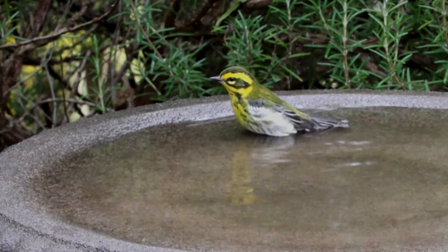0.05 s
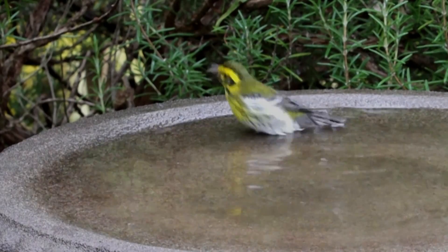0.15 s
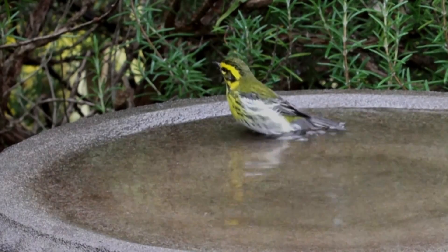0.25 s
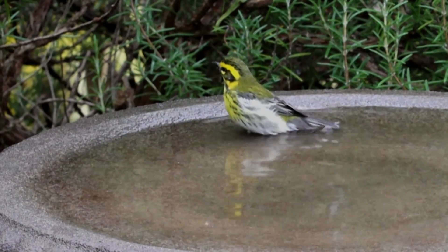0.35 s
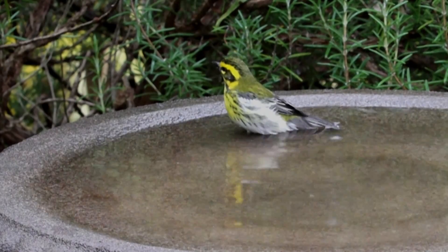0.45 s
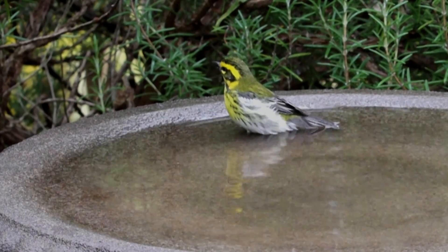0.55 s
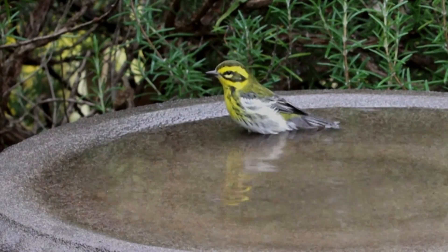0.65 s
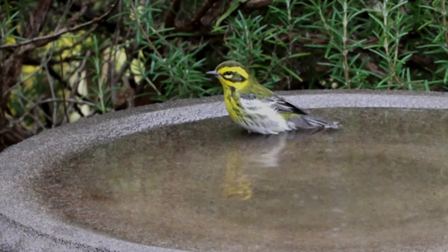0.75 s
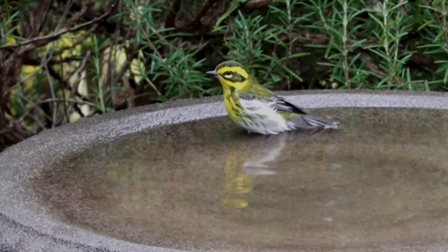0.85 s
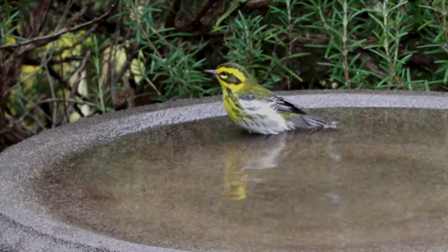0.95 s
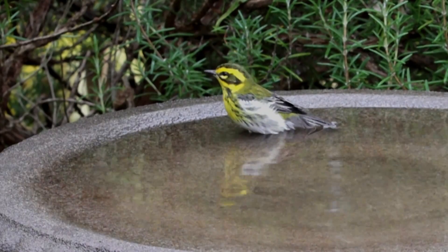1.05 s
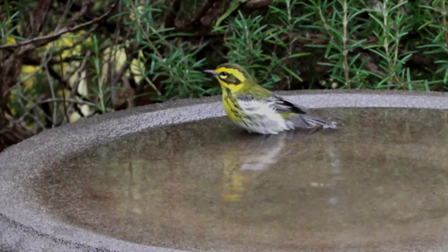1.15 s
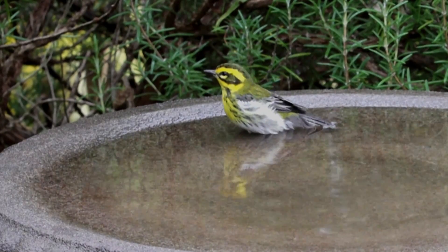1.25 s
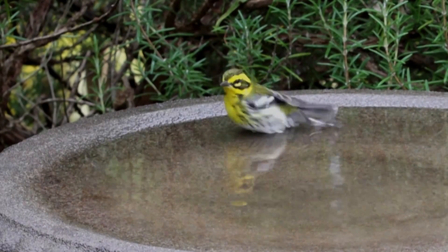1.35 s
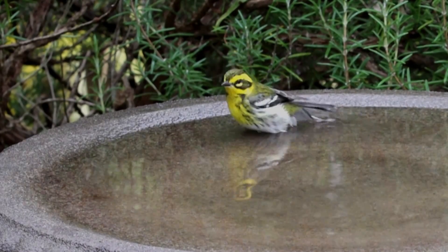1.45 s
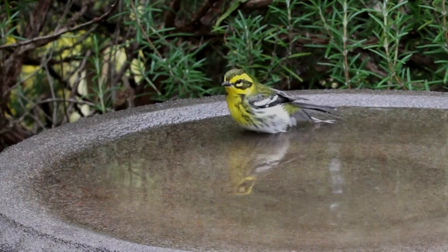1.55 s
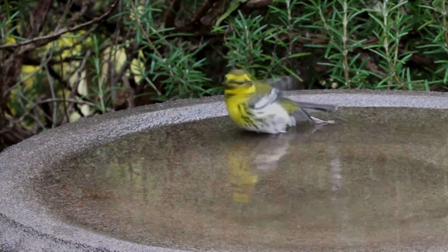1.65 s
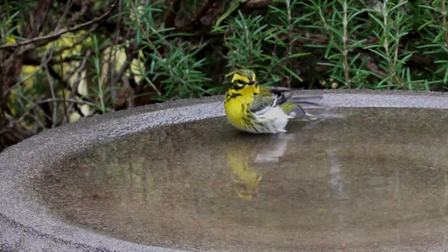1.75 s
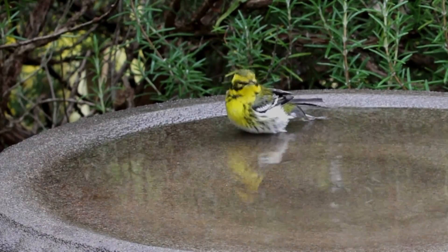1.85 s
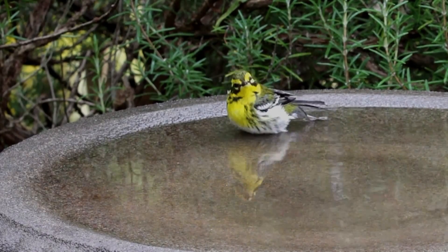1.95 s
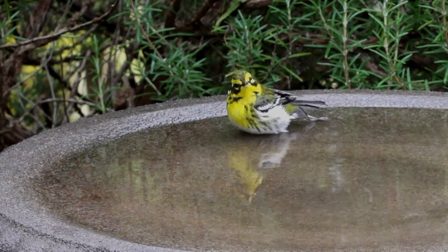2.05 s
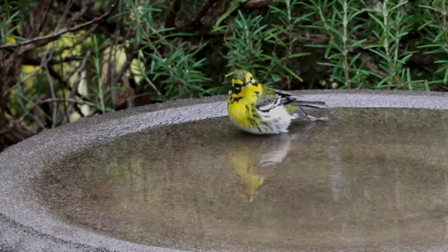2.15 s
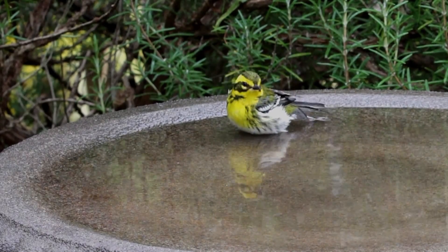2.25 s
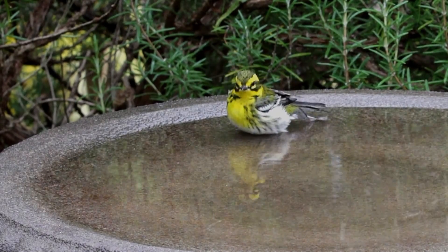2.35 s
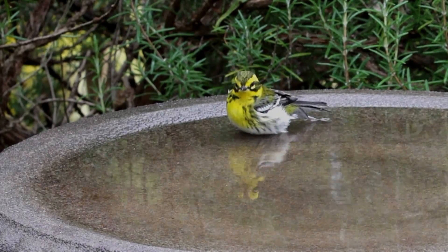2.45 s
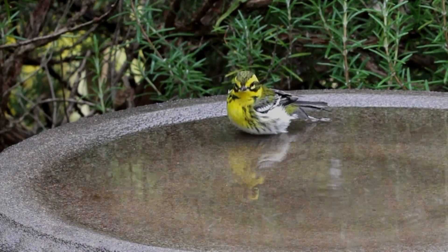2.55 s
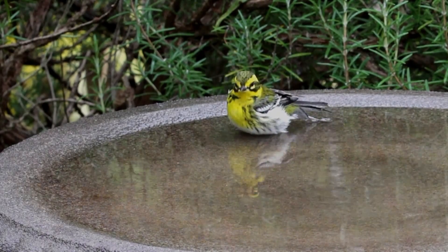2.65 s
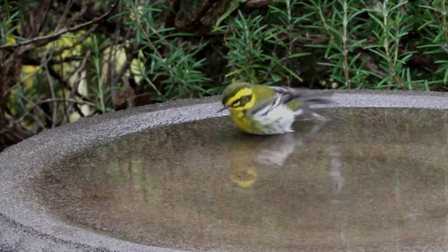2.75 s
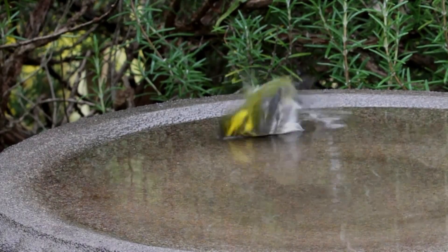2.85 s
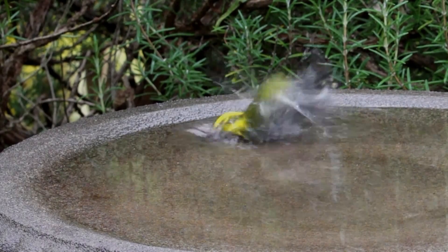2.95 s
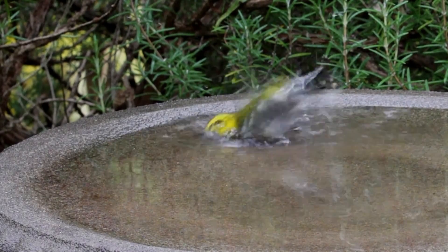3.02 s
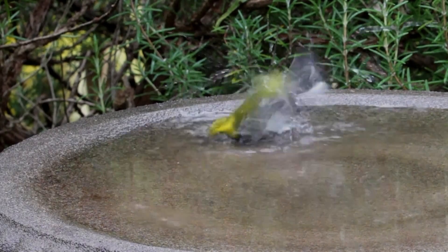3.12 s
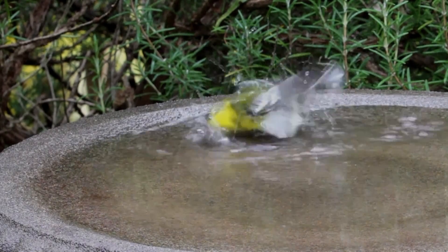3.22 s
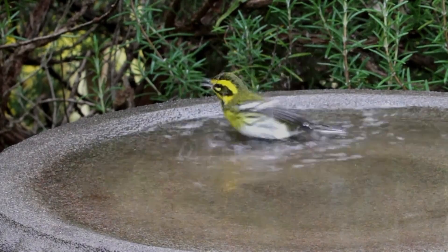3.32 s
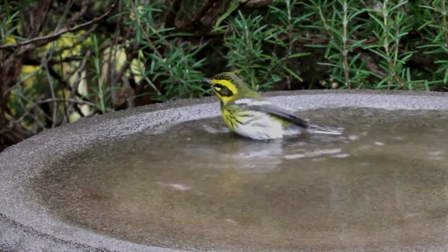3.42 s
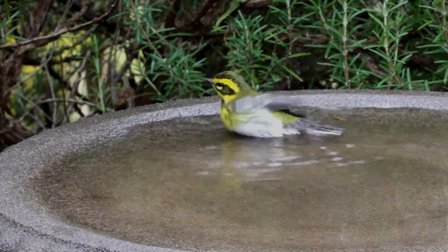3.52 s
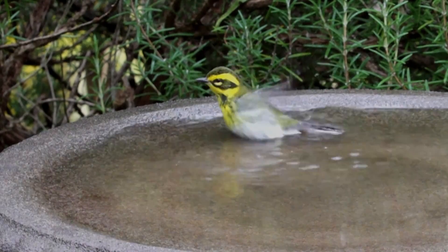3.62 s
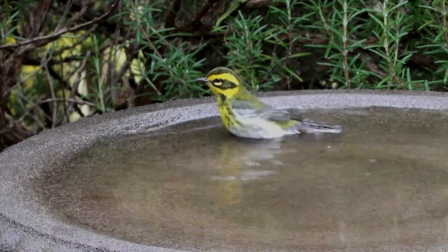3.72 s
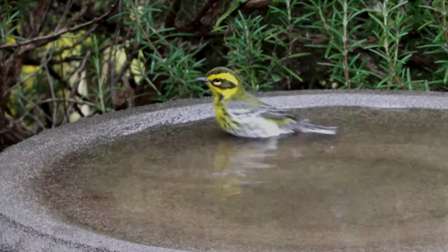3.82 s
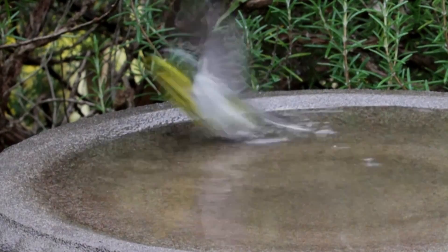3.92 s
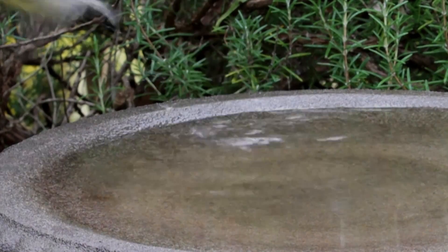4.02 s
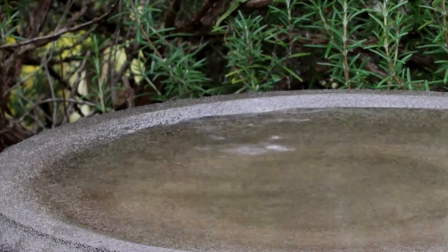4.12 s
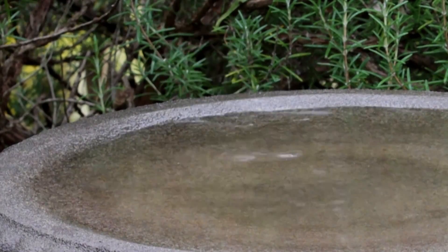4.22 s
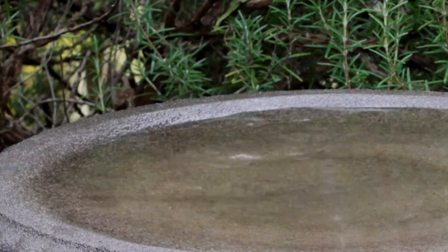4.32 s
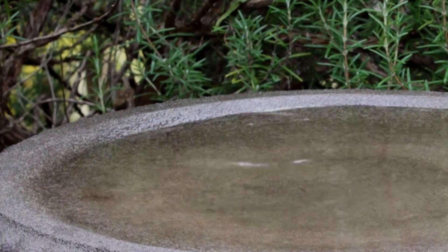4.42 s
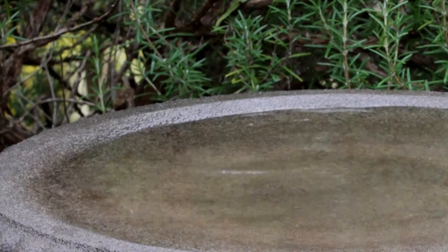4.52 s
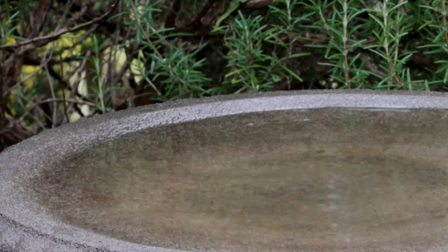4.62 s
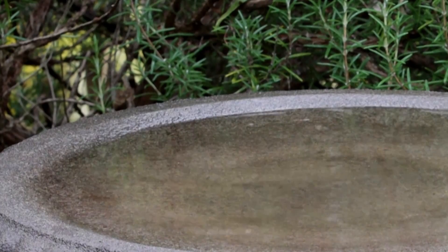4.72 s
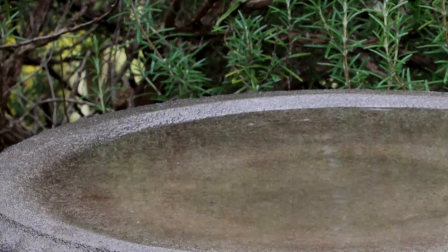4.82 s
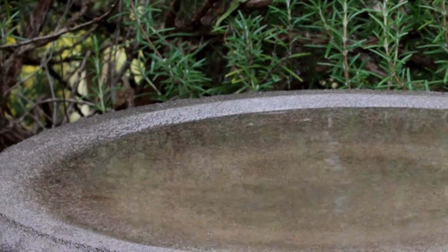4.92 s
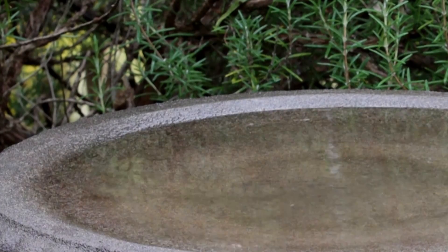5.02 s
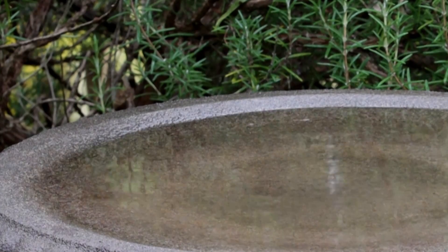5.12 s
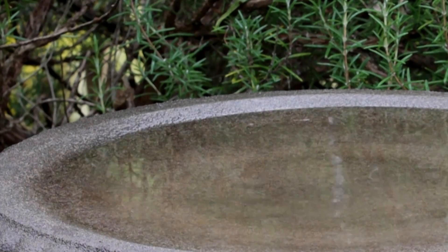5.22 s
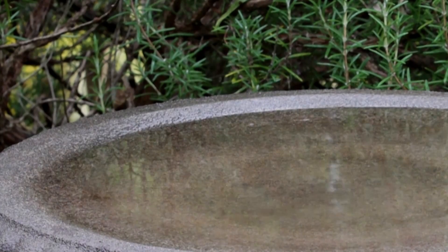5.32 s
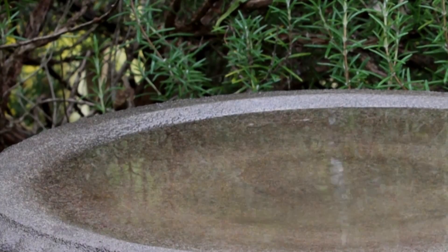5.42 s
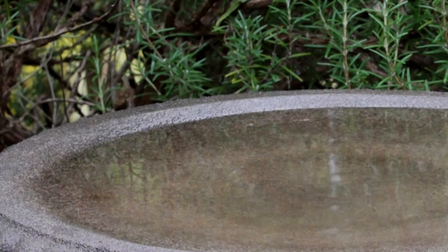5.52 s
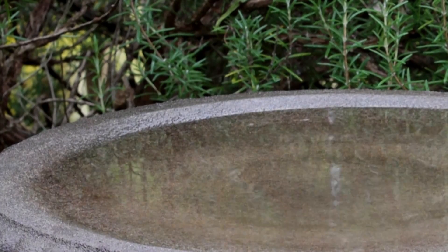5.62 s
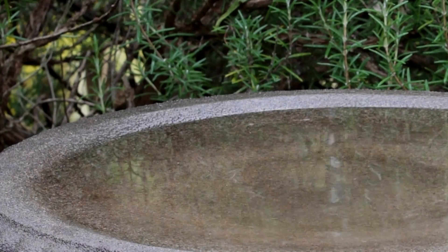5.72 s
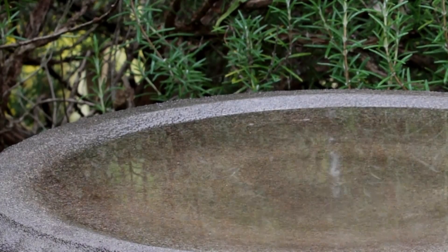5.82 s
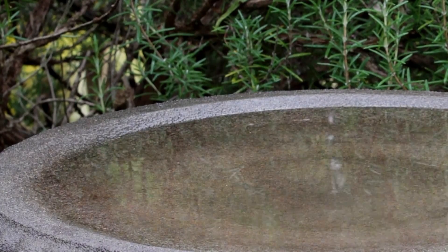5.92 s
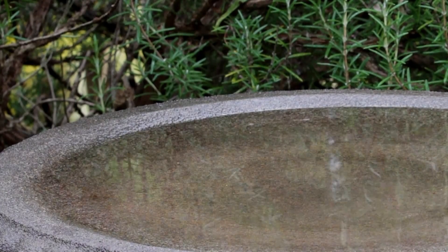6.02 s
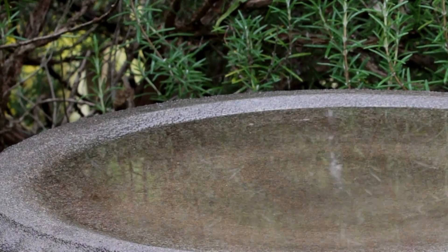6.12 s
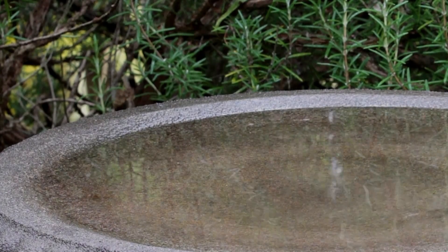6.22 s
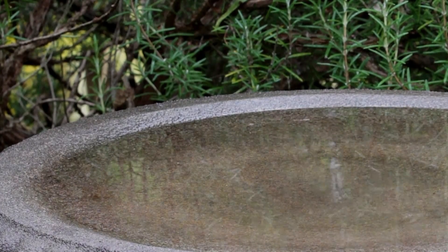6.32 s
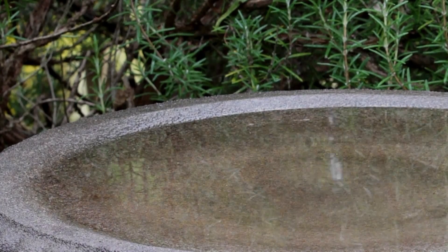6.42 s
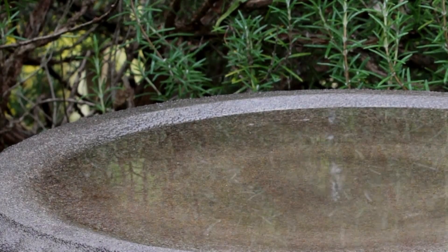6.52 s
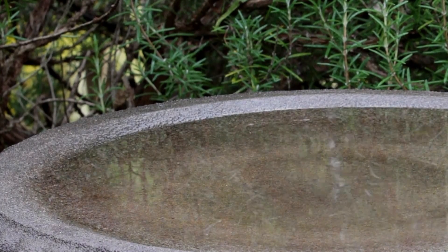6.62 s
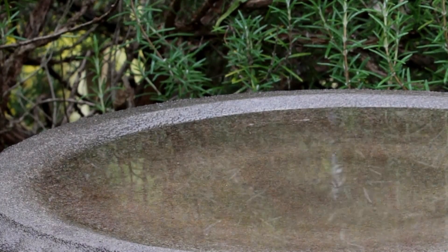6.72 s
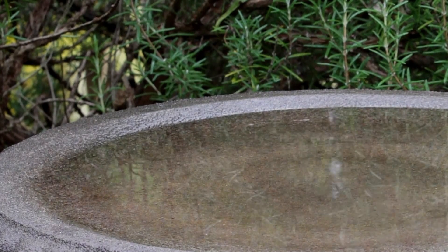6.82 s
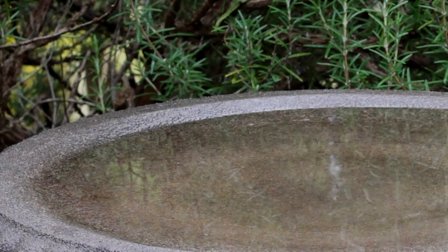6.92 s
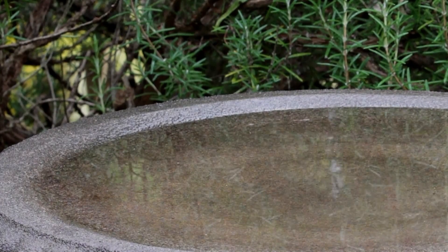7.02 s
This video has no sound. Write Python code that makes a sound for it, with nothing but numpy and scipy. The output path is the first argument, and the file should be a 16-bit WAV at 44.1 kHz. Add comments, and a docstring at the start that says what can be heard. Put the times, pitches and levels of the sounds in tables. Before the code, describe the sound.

A quiet garden with thin, airy stereo hiss that drifts in pitch and strength, little bass and a very short diffuse echo. A light wet slap ticks at the very start, with a faint distant note at 0.13. Around 0.4 to 0.55 come two harsh, scratchy high chips with tiny pure peaks. A weak high trill at 2.0 precedes a loud, piercing thin call at 2.2, only a tenth of a second long. From 3.07 to 3.42 wings slap shallow water in a crisp, uneven flurry with fine spray, alongside arched chips, a rasp and buzzy trills. Near silence follows. From about 4.05 to 4.65 the bird takes off: soft papery wingbeats, roughly 24 per second, over a feathery rush that swells, dulls and fades by 5. Then faint distant chirps, trills at 5.2 and 5.5, a chip at 5.63 and sparse notes to 6.5, ending in hiss.

```python
"""A small bird bathes in a shallow stone basin: wing slaps are noise bursts tuned by a spectral peak, with spray.
It then whirrs away: noise claps over a feather rush, plus one delayed reflection from the basin.
Small birds call with thin whistles, arched chips, rasps, trills and a short buzz, all frequency-modulated sines.
The shrubs and walls of the quiet garden answer with a short, exponentially decaying diffuse echo.
Bands of hiss come, go and glide, filtered from stereo noise; a fainter hiss stays and wavers."""
import sys
import numpy as np
from scipy import signal
from scipy.fft import rfft, irfft, next_fast_len
from scipy.io import wavfile
from scipy.ndimage import uniform_filter1d, map_coordinates

SR = 44100
rng = np.random.default_rng(int(sys.argv[2]) if len(sys.argv) > 2 else 0)


def inscribe(sig):
    """Save sig as 16-bit PCM at rate SR to the path in sys.argv[1].

    A 1-D sig is mono; a 2-D sig holds one channel per row.
    Samples are clipped to [-1, 1] before scaling.
    """
    pcm = np.round(np.clip(np.atleast_2d(sig).T, -1, 1) * 32767)
    wavfile.write(sys.argv[1], SR, pcm.astype(np.int16))


N = 311346
TIME = np.arange(N) / SR

# gliding bands of hiss: (spectral level/dB per Hz, [(t/s, lower edge f/Hz, upper edge f/Hz), ..])
HISS_BANDS = [ (-89, [(-.1, 970, 4470), (.19, 1106, 4400), (.32, 2800, 7150), (.66, 3150, 7250),
              (.78, 3280, 4200)]), (-91.5, [(1.58, 5500, 7150), (1.9, 5480, 5650), (2.5, 5300, 5420)]),
              (-88.5, [(1.85, 8600, 9670), (2.08, 7200, 9785), (2.53, 7220, 9995), (2.66, 9600, 10000)]),
              (-90, [(2.85, 1130, 2900), (2.97, 973, 7820), (3.08, 950, 7400), (3.17, 1530, 7500),
              (3.56, 2110, 7410), (3.7, 5700, 7330)]), (-89, [(4.9, 7670, 8160), (5.4, 5730, 9060),
              (5.63, 5450, 9070), (5.75, 5630, 7120), (5.98, 5570, 5840)]), (-89, [(4.9, 5050, 5420),
              (5.15, 2490, 4300), (5.6, 2654, 4100), (6.45, 2685, 4360), (6.65, 3980, 4760)]),
              (-99, [(.15, 997, 3000), (1.15, 2414, 3100), (1.45, 2350, 4840), (1.7, 1640, 5180),
              (2.05, 1880, 5270), (2.15, 2714, 5416), (2.44, 3063, 5400)]), (-98.5, [(2.65, 1870, 2430),
              (2.8, 1040, 3044), (2.95, 998, 6800)]), (-99, [(.65, 9480, 9640), (1.1, 8000, 9960),
              (1.45, 8420, 10230), (1.7, 9320, 10400), (2.35, 9180, 11190), (2.85, 9120, 11100),
              (2.97, 7480, 10890), (3.75, 7520, 10250), (4.1, 8500, 10060), (4.44, 8400, 9860)]),
              (-100.5, [(5.65, 5840, 9100), (6.5, 5620, 8760), (6.75, 5930, 8070)]),
              (-99, [(5.1, 2173, 3010), (5.8, 1903, 2880), (6.4, 2470, 3130), (6.8, 4066, 4840)]),
              (-111, [(6.35, 13930, 15800), (6.65, 10960, 15800), (7.2, 10520, 15800)])]
# fainter hiss under the bands: (t/s, spectral level/dB per Hz, lower edge f/Hz)
HISS_BED = [(0, -106, 1018), (2.05, -105, 1002), (4.8, -105, 1000), (4.97, -105, 2273), (5.8, -106, 1780),
            (6.6, -105.5, 2670), (6.9, -115, 2850)]
# hollows where the bed thins out: (centre t/s, length/s, centre f/Hz, width/Hz, level/dB)
HOLLOWS = [(0.037, 0.36, 7450, 4250, -5), (1.106, 0.4, 4200, 1900, -10), (2.38, 0.61, 1731, 1314, -13.5),
           (2.63, .38, 3670, 2900, -9), (4.205, .7, 7970, 1191, -10), (6.2, .4, 5200, 701, -9.5)]
# spectrum of the steady floor: (f/Hz, relative level/dB)
FLOOR_SPECTRUM = [(30, -19), (330, -20.5), (430, -11.5), (800, -16.5), (2000, -15.5), (9000, -11.5),
                  (11000, -7), (15500, 1.5)]
# spectrum of the faint dull hiss: (f/Hz, relative level/dB)
DULL_SPECTRUM = [(330, -44), (420, -8.5), (530, -0.5), (620, -9), (800, -8.5), (1100, 2.5), (1500, -40)]
# swelling and fading of the dull hiss: (t/s, level/dB)
DULL_LEVEL = [(.7, -98), (1.1, -86), (1.75, -84.5), (1.95, -99), (2.65, -102.5), (2.85, -93), (3.5, -84),
              (3.7, -100), (4.9, -87.5), (5.2, -108)]
# wings slapping the water: (t/s, relative level/dB, f/Hz)
SLAPS = [(0.0101, -24.5, 2250), (3.068, -39.5, 3000), (3.075, -35.5, 2500), (3.115, -24.5, 1890),
         (3.119, -20, 1900), (3.138, -30.5, 2380), (3.1648, -11, 2280), (3.217, -38, 2390),
         (3.249, -21.5, 3380), (3.271, -18, 2830), (3.318, -31.5, 2850), (3.413, -24.5, 3580),
         (3.42, -26.5, 3050), (3.763, -47, 2620)]
# spectrum of slaps and spray: (f/Hz, relative level/dB)
WATER_SPECTRUM = [(600, -52), (1100, -41), (1700, -4), (2800, 7), (3700, 2), (4600, -15.5), (7000, -30.5),
                  (10000, -58.5)]
# decay of the garden echo: (f/Hz, time to fall by 60 dB/s)
GARDEN_DECAY = [(500, 0.15), (9000, 0.3)]
# notes further off: (t/s, length/s, f/Hz, relative level/dB)
FAR_NOTES = [(0.131, 0.1, 3513, -49), (3.003, 0.029, 3490, -56), (5.139, 0.057, 3353, -49.5),
             (5.698, 0.056, 3445, -47), (5.75, 0.06, 3390, -53), (5.813, 0.047, 3470, -49),
             (5.725, 0.061, 3046, -53.5), (5.975, 0.037, 3347, -44.5), (6.016, 0.026, 3380, -51),
             (6.364, 0.034, 3230, -49), (6.493, 0.044, 3605, -54.5)]
# trilled notes: (t/s, length/s, f/Hz, relative level/dB, trill rate/Hz, trill depth/Hz)
TRILLS = [(2.03, 0.11, 7710, -48.5, 65.1, 155), (3.261, 0.044, 3595, -33.5, 360, 260),
          (3.292, 0.12, 3308, -37, 361, 382), (5.188, 0.19, 7730, -47, 60.7, 126),
          (5.459, 0.14, 7540, -45.5, 56.5, 108)]
# faint low patches of narrow noise: (t/s, length/s, f/Hz, relative level/dB)
LOW_PATCHES = [(.92, 0.29, 1013, -79), (2.12, .18, 1204, -82)]
# pure peaks of the harsh chips: (t/s, length/s, f/Hz, relative level/dB)
PURE_PEAKS = [(0.4307, 0.0083, 6410, -17.5), (0.441, 0.0073, 6380, -25.5), (0.497, 0.0051, 6530, -24)]
# rasps around the peaks and after the second arched chip: (t/s, length/s, f/Hz, relative level/dB, jitter/Hz)
RASPS = [(0.41, 0.055, 3950, -38.5, 280), (.415, 0.031, 4950, -42.5, 260), (.414, 0.049, 6370, -35, 190),
         (0.46, 0.058, 3850, -41.5, 320), (0.477, 0.046, 6450, -35.5, 200), (.49, 0.037, 5550, -41, 400),
         (0.54, 0.061, 3600, -52, 220), (.515, .08, 6400, -47, 270), (3.243, .05, 4850, -39, 430)]
# contour of the loud thin call: (t/s, f/Hz, level/dB)
THIN_CALL = [(2.19, 9260, -54.5), (2.203, 8930, -39), (2.212, 8750, -30.5), (2.217, 8630, -17),
             (2.243, 8580, -16), (2.249, 8620, -21.5), (2.255, 8870, -13.5), (2.265, 8720, -13),
             (2.271, 8930, -19.5), (2.286, 9040, -19), (2.294, 8970, -40)]
# contour of every arched chip: (share of length, f over top f, relative level/dB)
CHIP_ARCH = [(0, .77, -34), (.11, .87, -6), (.24, .96, -3), (.42, 1, -4), (.68, .975, 0), (.87, .905, 2),
             (.93, .85, -10), (1, .76, -30)]
# arched chips: (t/s, length/s, top f/Hz, relative level/dB)
CHIPS = [(3.104, 0.059, 6540, -24.5), (3.225, 0.037, 5450, -33), (5.631, .042, 7050, -34.5)]
# wingbeats of the take-off: (t/s, relative level/dB, f/Hz)
WINGBEATS = [(4.05, -26, 2685), (4.061, -34.5, 2690), (4.092, -39.5, 2520), (4.134, -24.5, 2700),
             (4.168, -26, 1700), (4.173, -22.5, 2200), (4.214, -17, 2520), (4.237, -29, 2320),
             (4.256, -21.5, 2890), (4.295, -22, 1920), (4.3371, -19.5, 2690), (4.376, -18, 1894),
             (4.419, -26, 1460), (4.459, -23, 1487), (4.4994, -22.5, 1795), (4.541, -23, 1510),
             (4.583, -27.5, 1150), (4.625, -32, 1100)]
# feather rush: (t/s, relative level/dB, upper edge f/Hz of rush and claps)
FEATHER_RUSH = [(3.93, -66, 2100), (4.02, -50, 3940), (4.06, -47, 6220), (4.21, -38.5, 6500),
                (4.33, -39.5, 6790), (4.54, -43, 4580), (4.68, -54.5, 3000), (4.77, -60.5, 2590),
                (4.83, -65, 1414), (5, -68, 1137), (5.2, -93, 1100)]
# spectrum of claps and rush: (f/Hz, relative level/dB)
FEATHER_SPECTRUM = [(330, -70), (430, -26), (540, -11.5), (780, -0.5), (1300, 2), (1900, 3), (3200, 3),
                    (4400, -2.5), (5200, -11.5), (6300, -16.5), (7200, -35), (10000, -68)]

EDGE_HZ, FADE_S = 83, 0.04  # softness of a hiss band's edges and ends
BED_TOP_HZ = 8620
SPRAY_DB, SPRAY_RISE_S, SPRAY_FALL_S = -22, 0.015, 0.0097  # level relative to the table level of the slap
STROKE_DB, STROKE_S = 3.5, 0.0043  # swell of the rush at each wingbeat: height and half length
HARSH_ECHO_DB = -12
LOW_CUT_HZ, TOP_HZ = 490, 15780


def amp(db):
    """Amplitude gain is ten to the power of level/20."""
    return 10 ** (np.asarray(db) / 20)


def unit(x):
    """Normalisation to a root-mean-square value of 1."""
    return x / np.sqrt(np.mean(x ** 2) + 1e-20)


def along(points, hz):
    """Interpolation of (f/Hz, value) points along a logarithmic frequency axis."""
    f, value = np.transpose(points)
    return np.interp(np.log(hz + 1), np.log(f), value)


def colour(points):
    """Spectral colouring: the amplitude response of (f/Hz, level/dB) points."""
    return lambda hz: amp(along(points, hz))


def curves(rows, at=TIME):
    """Piecewise linear contours: each column is interpolated over the first."""
    x, *columns = np.transpose(rows)
    return [np.interp(at, x, column) for column in columns]


def during(rows):
    """A gate open between first and last row, smoothed at the ends to avoid clicks."""
    gate = (TIME >= rows[0][0]) & (TIME <= rows[-1][0])
    return uniform_filter1d(1. * gate, size=128)


def wobble(rate, size=N):
    """Band-limited random modulation: a smooth curve through rate random knots a second."""
    knots = rng.standard_normal(int(size * rate / SR) + 4)
    return map_coordinates(knots, [np.arange(size) * rate / SR])


def filtered(x, response):
    """Linear filtering: the spectrum is multiplied by a response of frequency."""
    n = x.shape[-1]
    padded = next_fast_len(n + SR // 8)
    spectrum = rfft(x, padded) * response(np.fft.rfftfreq(padded, 1 / SR))
    return irfft(spectrum, padded)[..., :n]


def shaped(x, gain):
    """Time-varying filtering: the short-time spectrum is multiplied by a gain of frequency and time."""
    hz, t, z = signal.stft(x, SR, nperseg=512)
    return signal.istft(z * gain(hz[:, None], t), nperseg=512)[1][:, :N]


def band(low_hz, high_hz, order):
    """A band-pass response whose order sets the steepness of its edges."""
    return lambda hz: 1 / np.sqrt((1 + (low_hz / (hz + 1)) ** order) * (1 + (hz / high_hz) ** order))


def window(v, low, high, soft):
    """A smooth gate near 1 between two bounds, with hyperbolic-tangent edges."""
    return (1 + np.tanh((v - low) / soft)) * (1 + np.tanh((high - v) / soft)) / 4


def stereo(mid, side, side_db):
    """Mid-side stereo: the side signal is added on one side and subtracted on the other."""
    return np.array([mid + amp(side_db) * side, mid - amp(side_db) * side])


def rush(response, side_db):
    """Coloured noise: filtered random mid and side signals give stereo of rms 1."""
    mid, side = filtered(rng.standard_normal((2, N)), response)
    return unit(stereo(mid, side, side_db))


def tone(hz):
    """Frequency modulation: phase is the running sum of frequency, in a sine of rms 1."""
    return np.sqrt(2) * np.sin(2 * np.pi * np.cumsum(hz) / SR)


def add(track, s, x):
    """Superposition: x is mixed into the track from time s."""
    i = round(s * SR)
    x = x[max(-i, 0):N - i]
    track[max(i, 0):][:len(x)] += x


def note(length, hz, jitter_hz, rate=0, depth=0, bend=0.006, fullness=0.89):
    """Frequency modulation of a rounded note: random jitter makes a rasp, a periodic swing a trill."""
    u = np.linspace(0, 1, int(length * SR))
    swell = (4 * u * (1 - u)) ** fullness
    arch = 1 + bend * (swell - swell.mean())
    swing = depth * np.sin(2 * np.pi * rate * length * u)
    return swell * tone(hz * arch + swing + jitter_hz * wobble(1100, len(u)))


def grain(length, depth_db, rate):
    """Random amplitude modulation of rms 1 gives a note its roughness."""
    return unit(amp(depth_db * wobble(rate, int(length * SR))))


def blows(rows, spectrum, rise, crack, puff, puff_db, focus_db):
    """Impulsive noise: a sharp crack within a softer puff, with a spectral peak at each blow's pitch."""
    out = np.zeros(N)
    t = np.arange(SR // 16) / SR - 0.02
    soft = np.exp(-np.where(t < 0, -t / rise, t / puff))
    shape = np.exp(-abs(t) / crack) + amp(puff_db) * soft
    for s, db, pitch in rows:
        def response(hz):
            focus = focus_db * np.exp(-(np.log((hz + 1) / pitch) / 0.53) ** 2)
            return amp(along(spectrum, hz) + focus)
        burst = filtered(shape * rng.standard_normal(len(t)), response)
        # the crack is centred 1.5 ms after the table time
        add(out, s + t[0] + 0.0015, amp(db) / 2 * shape.std() * unit(burst))
    return out


def hollows(hz, t):
    """Spectral notches limited in time: rounded dips in the gain of the hiss bed."""
    db = 0
    for s, length, centre, width, depth_db in HOLLOWS:
        distance = np.hypot(2 * (t - s) / length, 2 * (hz - centre) / width)
        db = db + depth_db / (1 + distance ** 10)
    return amp(db)


def gliding_hiss():
    """Incoherent power addition: gliding noise bands over a fainter bed with hollows in it."""
    def gain(hz, t):
        bed_db, bed_hz = curves(HISS_BED, t)
        bed = amp(bed_db) * hollows(hz, t) * window(hz, bed_hz, BED_TOP_HZ, 200)
        power = bed ** 2
        for db, edges in HISS_BANDS:
            low_hz, high_hz = curves(edges, t)
            lasting = window(t, edges[0][0], edges[-1][0], FADE_S)
            power = power + (amp(db) * window(hz, low_hz, high_hz, EDGE_HZ) * lasting) ** 2
        return np.sqrt(power * SR / 2)  # white noise of rms 1 spreads its power over SR / 2
    return shaped(rush(np.ones_like, side_db=-3.0), gain)


def faint_hiss():
    """Stationary and amplitude-modulated noise: a steady floor and a dull hiss that swells and fades."""
    floor = amp(-74.5) * rush(colour(FLOOR_SPECTRUM), side_db=-1.0)
    dull = amp(curves(DULL_LEVEL)[0]) * rush(colour(DULL_SPECTRUM), side_db=-11)
    return floor + dull


def bathing():
    """Impact noise of wings on water, each slap throwing a fine spray of randomly modulated noise."""
    slaps = blows(SLAPS, WATER_SPECTRUM, rise=0.0039, crack=0.00082, puff=0.0068,
                  puff_db=-17.5, focus_db=27.0)
    grainy = rng.standard_normal(N) * amp(9.0 * wobble(700))
    drops = unit(filtered(grainy, colour(WATER_SPECTRUM)))
    spray = np.zeros(N)
    for s, db, _ in SLAPS:
        decay = np.maximum((s - TIME) / SPRAY_RISE_S, (TIME - s) / SPRAY_FALL_S)
        spray += amp(db + SPRAY_DB) * np.exp(-decay)
    return slaps + spray * drops


def garden(x, side_db):
    """Diffuse reflection from shrubs and walls: convolution with decaying noise, nearly alike on both sides."""
    hz, t, z = signal.stft(rng.standard_normal((2, SR // 2)), SR, nperseg=256)
    decay = amp(-60 * t / along(GARDEN_DECAY, hz)[:, None])
    mid, side = signal.istft(z * decay, SR, nperseg=256)[1]
    tail = stereo(mid, side, side_db)
    delayed = np.pad(x, (SR // 300, 0))  # 1/300 s before the first reflection
    return signal.oaconvolve(delayed[None], tail / np.linalg.norm(tail[0]), axes=1)[:, :N]


def calls_and_patches():
    """Frequency and amplitude modulation: hoarse narrow-band notes, trills, a buzz; faint low noise patches."""
    notes, out = np.zeros(N), np.zeros(N)
    for s, length, hz, db in FAR_NOTES:
        rough = grain(length, 2.3, 250)
        clear = note(length, hz, jitter_hz=80)
        hoarse = note(length, hz, jitter_hz=330)
        add(notes, s, amp(db) * rough * (clear + amp(-9.5) * hoarse))
    for s, length, hz, db, rate, depth in TRILLS:
        add(out, s, amp(db) * note(length, hz, 64, rate, depth) * grain(length, 1.7, 220))
    for s, length, hz, db in LOW_PATCHES:
        add(out, s, amp(db) * note(length, hz, jitter_hz=190))
    return out + filtered(notes, band(2500, 5400, order=30))


def harsh_chips():
    """Random frequency modulation: slight in the brief pure peaks, wide in the grainy rasps."""
    out = np.zeros(N)
    for s, length, hz, db in PURE_PEAKS:
        add(out, s, amp(db) * note(length, hz, jitter_hz=45))
    for s, length, hz, db, jitter_hz in RASPS:
        add(out, s, amp(db) * note(length, hz, jitter_hz) * grain(length, 2.0, 380))
    return filtered(out, band(2600, 7300, order=30))


def near_calls(second_hz=9880, coupling=0.2, second_db=-20.0):
    """Two coupled voices, one from each side of the syrinx, form a thin call; arched chips have a raspy part."""
    hz, db = curves(THIN_CALL)
    upper_hz = second_hz + coupling * (hz - hz.min()) + 70 * wobble(400)
    voices = tone(hz + 12 * wobble(300)) + amp(second_db) * tone(upper_hz)
    out = voices * amp(db) * during(THIN_CALL)
    for s, length, top_hz, db in CHIPS:
        ratio, shape_db = curves(CHIP_ARCH, np.linspace(0, 1, int(length * SR)))
        n = len(ratio)
        whistle = amp(0.29 * wobble(300, n)) * tone(top_hz * ratio + 45 * wobble(710, n))
        rasp = tone(top_hz * ratio + 380 * wobble(1100, n))
        add(out, s, amp(db + shape_db) * (whistle + amp(-14) * rasp))
    return out


def flight(clap_db=0.5, bounce_s=0.001595, bounce_share=0.24):
    """Flow noise swells with each wingbeat's clap; the basin reflects both; their upper edge falls at last."""
    claps = amp(clap_db) * blows(WINGBEATS, FEATHER_SPECTRUM, rise=0.003, crack=0.0012, puff=0.0056,
                                 puff_db=-9.5, focus_db=12.5)
    rush_db, edge_hz = curves(FEATHER_RUSH)
    strokes = [np.exp(-((TIME - s) / STROKE_S) ** 2) for s, _, _ in WINGBEATS]
    stroke_db = STROKE_DB * np.max(strokes, axis=0)
    grainy = amp(2.6 * wobble(900)) * rush(np.ones_like, side_db=-12.0)
    air = unit(filtered(grainy, colour(FEATHER_SPECTRUM)))
    feathers = air * amp(rush_db + stroke_db + wobble(120)) * during(FEATHER_RUSH)

    def below_edge(hz, t):
        return band(1, np.interp(t, TIME, edge_hz), order=30)(hz)
    wings = shaped(claps + feathers, below_edge)
    return filtered(wings, lambda hz: 1 + bounce_share * np.exp(-2j * np.pi * hz * bounce_s))


def scene():
    """Superposition of sources, echo and hiss; a steep low cut removes the bass from all but the hiss."""
    hiss = gliding_hiss() + faint_hiss()
    water, far, harsh, near, wings = bathing(), calls_and_patches(), harsh_chips(), near_calls(), flight()
    near_echo = garden(amp(-13) * near + amp(HARSH_ECHO_DB) * harsh, side_db=-13.0)
    wide_send = amp(-4) * far + amp(-9.5) * water + amp(-6.5) * wings.mean(axis=0)
    wide_echo = garden(wide_send, side_db=-6.5)
    sources = near + harsh + far + water + wings + near_echo + wide_echo
    return filtered(sources, band(LOW_CUT_HZ, 14000, order=32)) + hiss


def record(dry):
    """Ideal low-pass filtering: nothing is kept from the band limit upwards."""
    return filtered(dry, lambda hz: hz < TOP_HZ)


dry = scene()
out = record(dry)
inscribe(out)
```